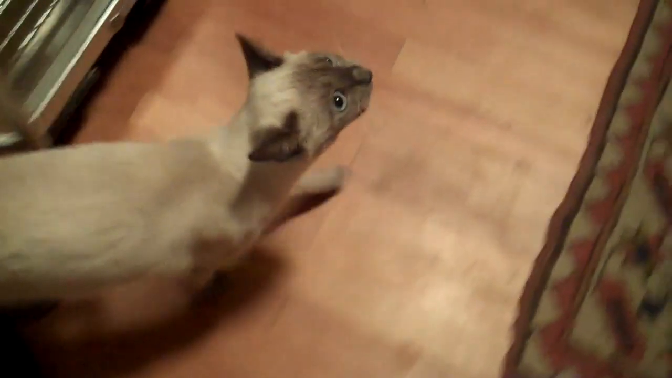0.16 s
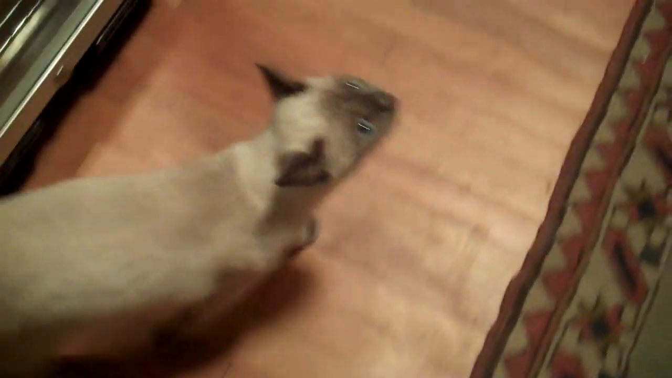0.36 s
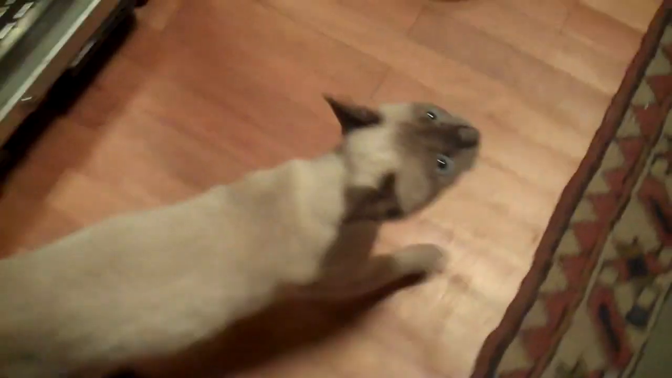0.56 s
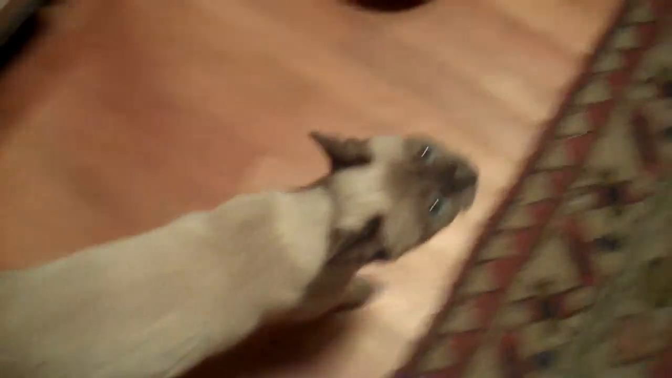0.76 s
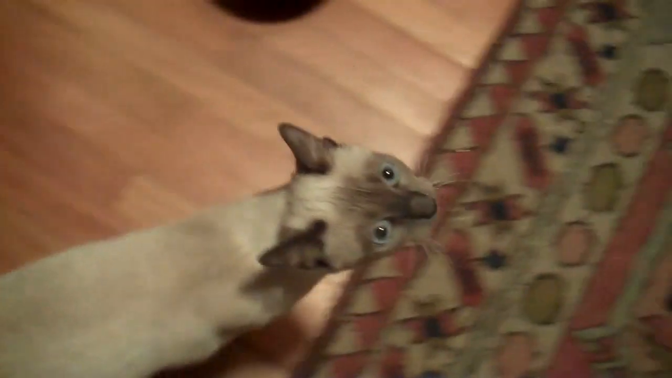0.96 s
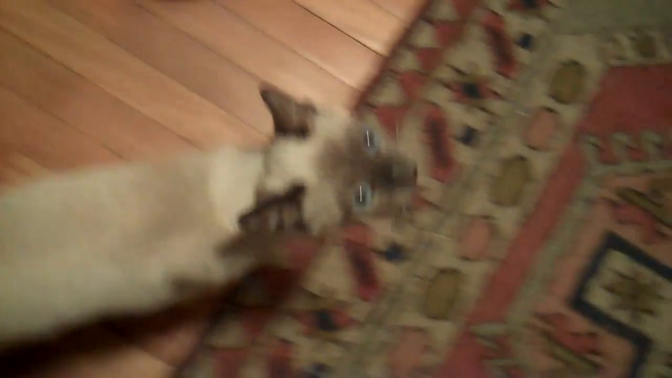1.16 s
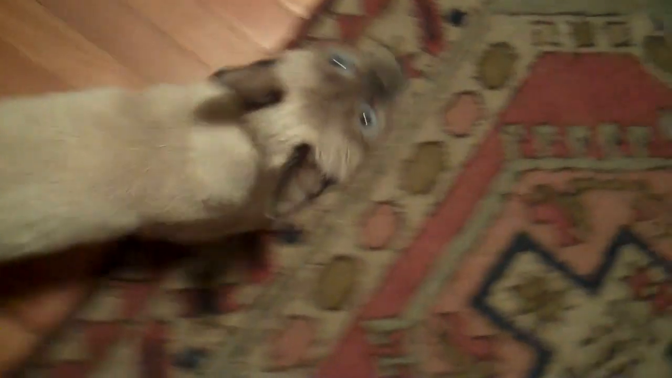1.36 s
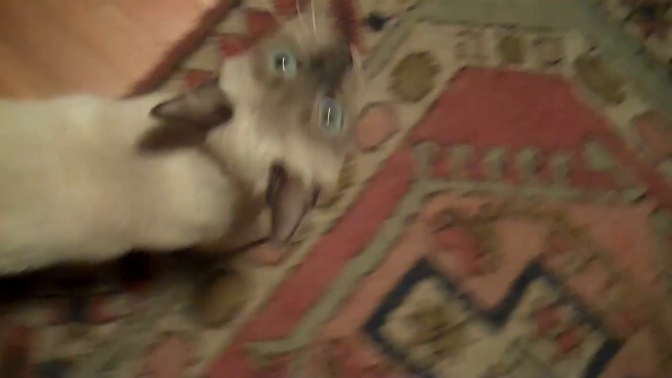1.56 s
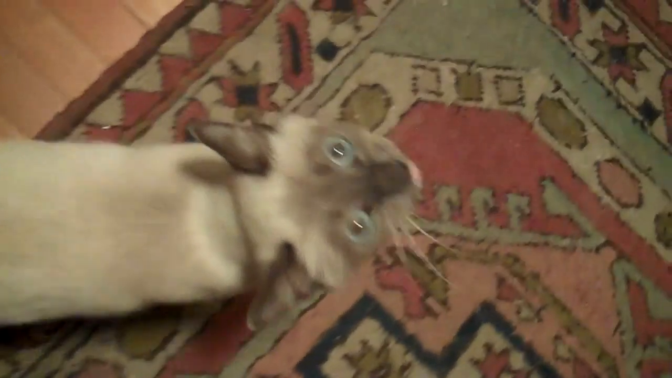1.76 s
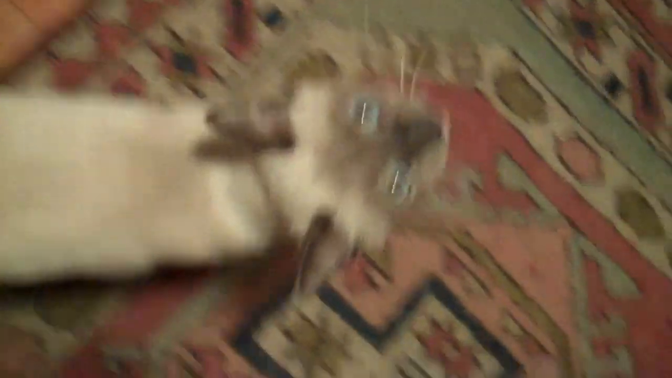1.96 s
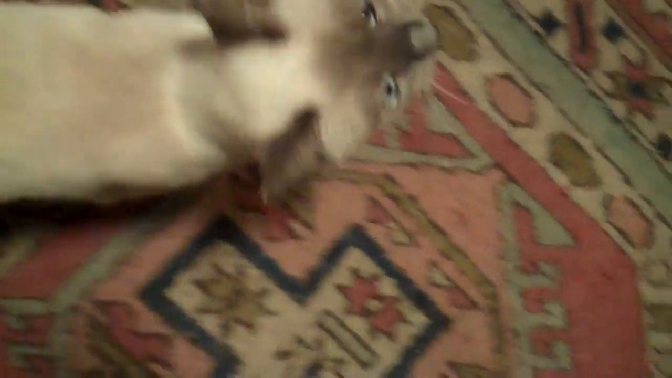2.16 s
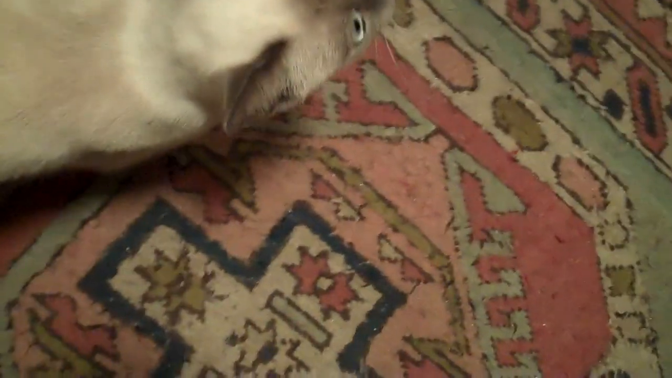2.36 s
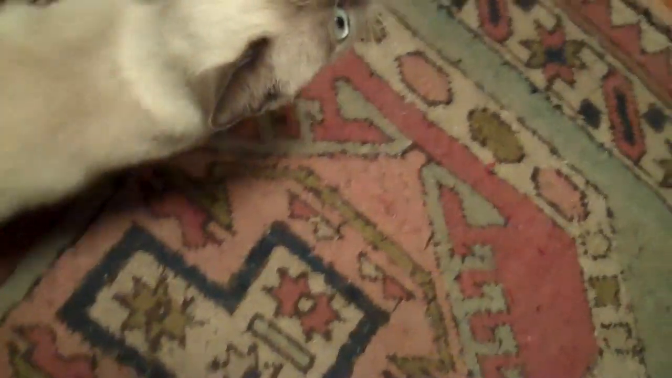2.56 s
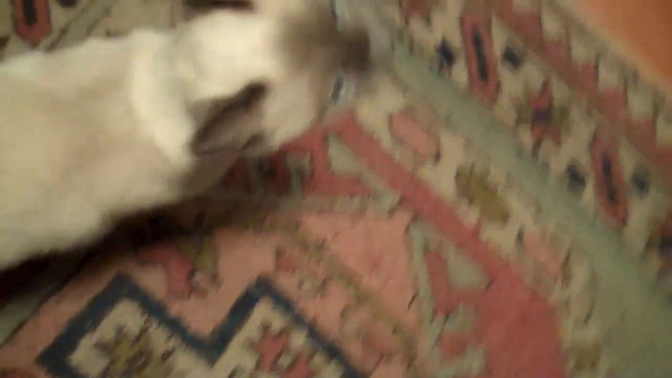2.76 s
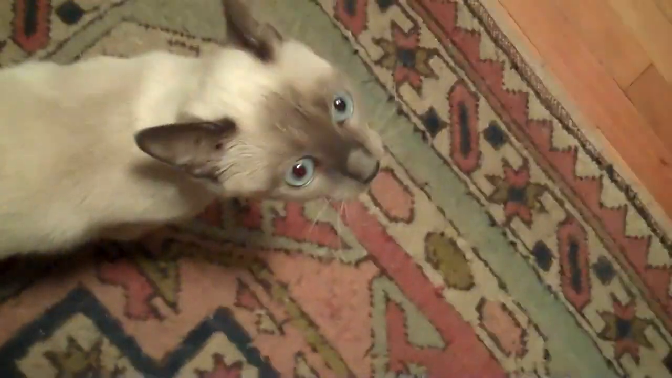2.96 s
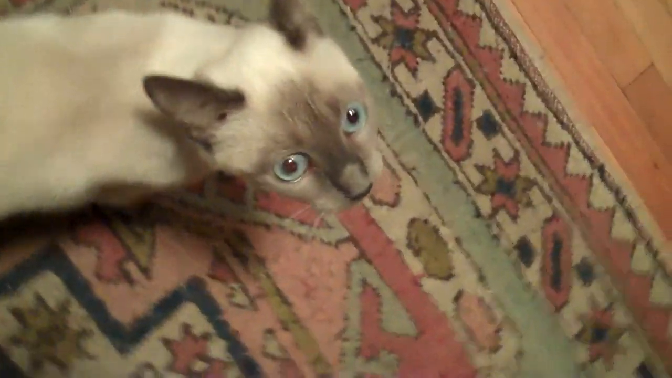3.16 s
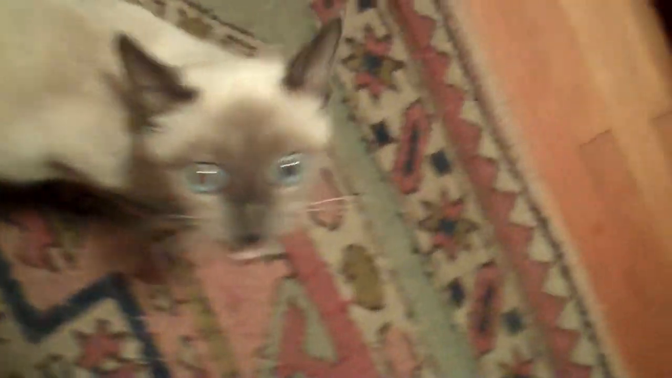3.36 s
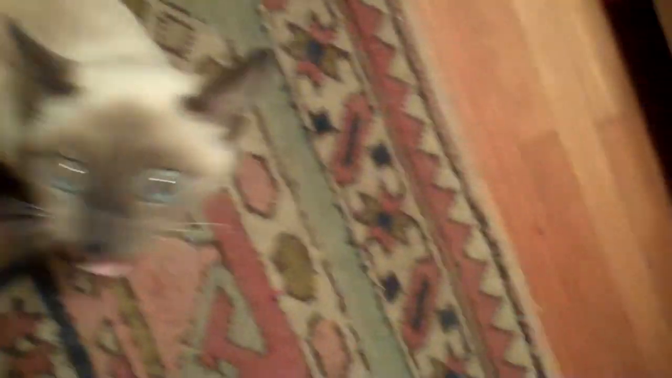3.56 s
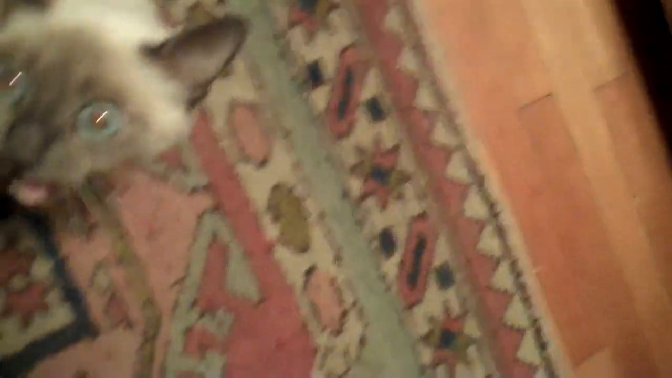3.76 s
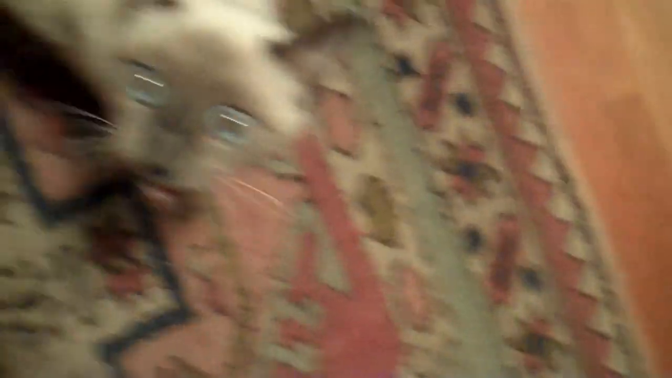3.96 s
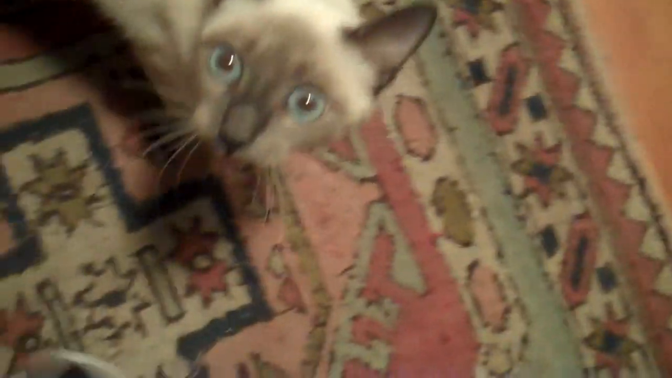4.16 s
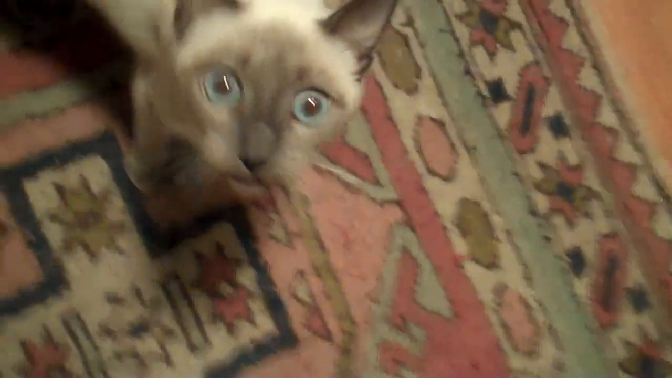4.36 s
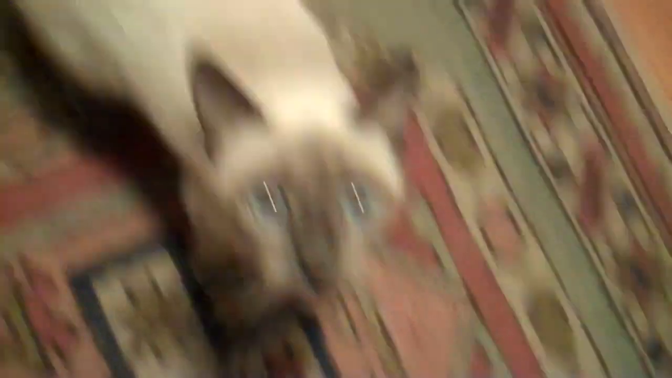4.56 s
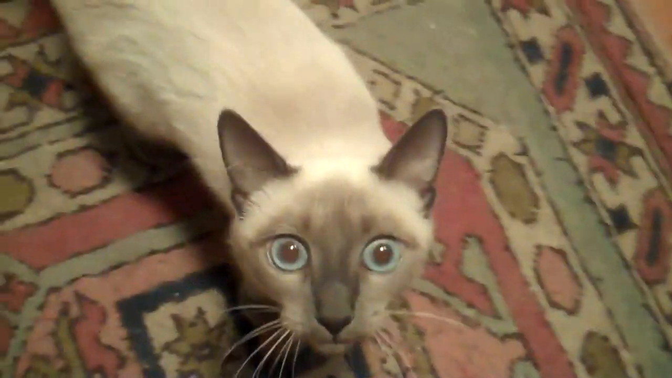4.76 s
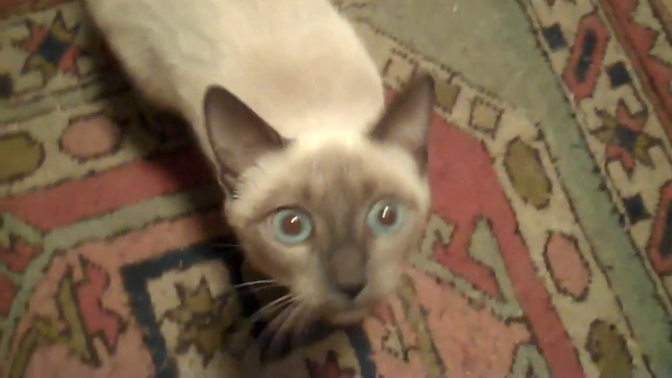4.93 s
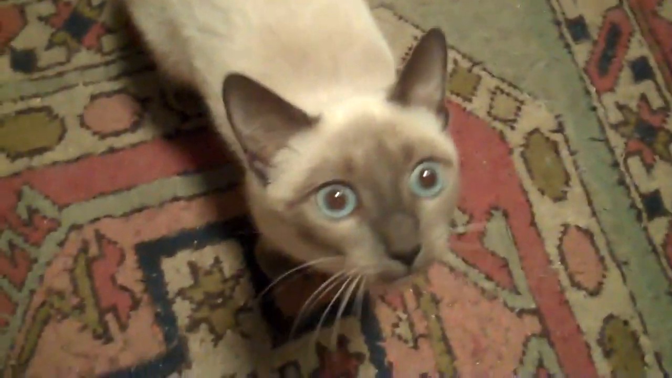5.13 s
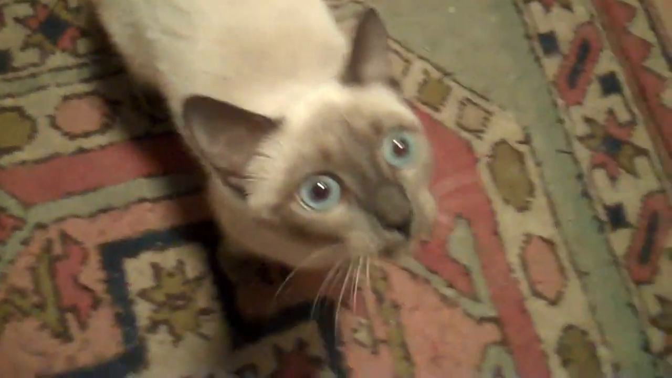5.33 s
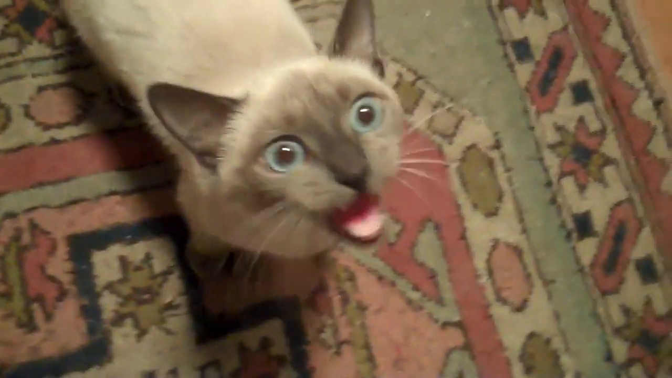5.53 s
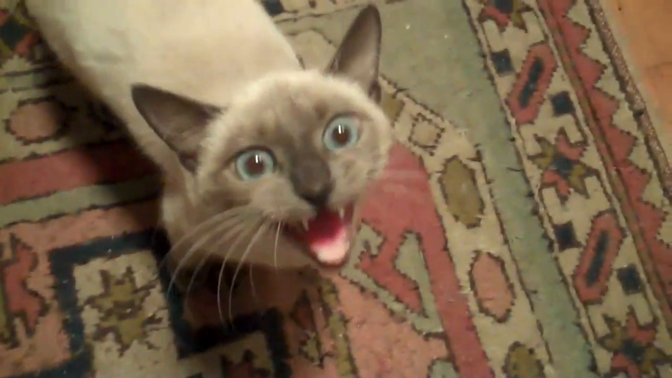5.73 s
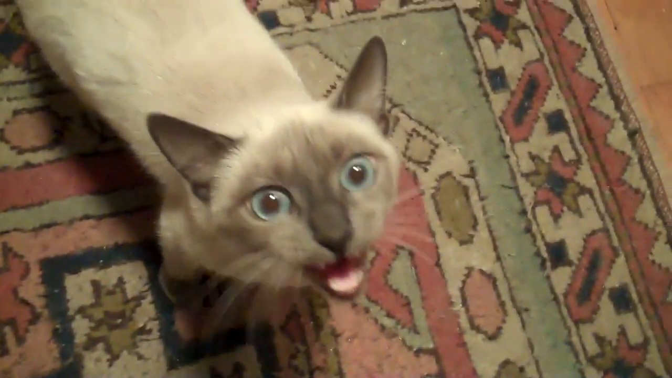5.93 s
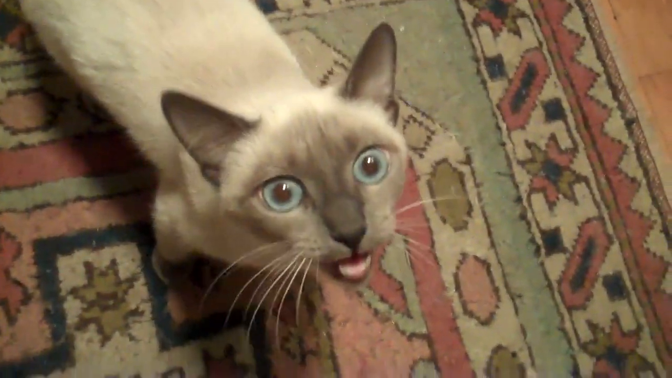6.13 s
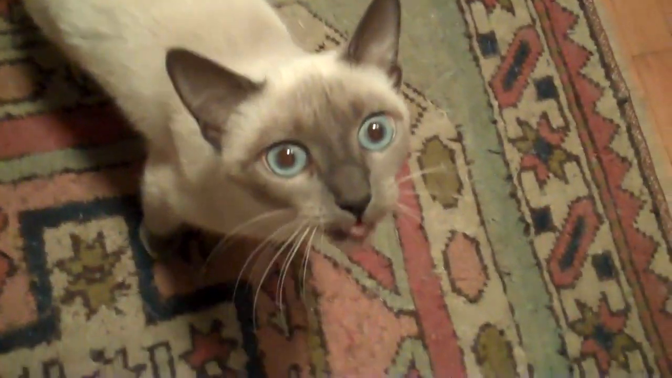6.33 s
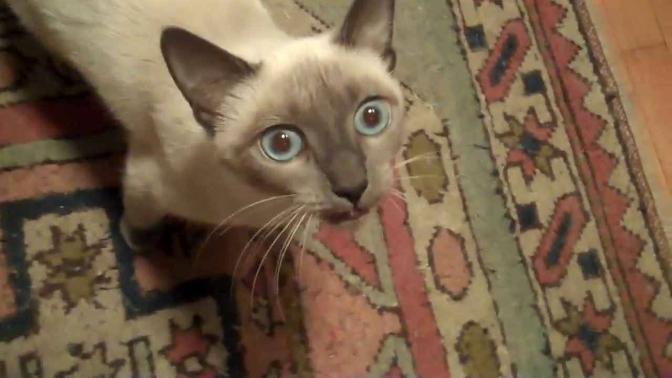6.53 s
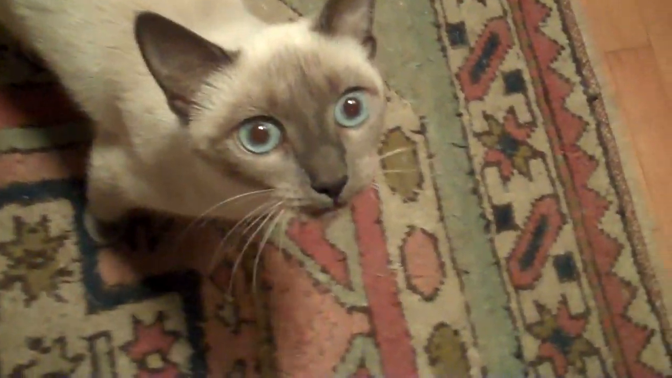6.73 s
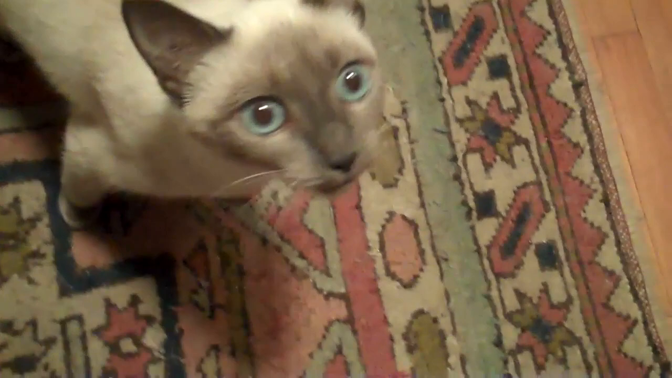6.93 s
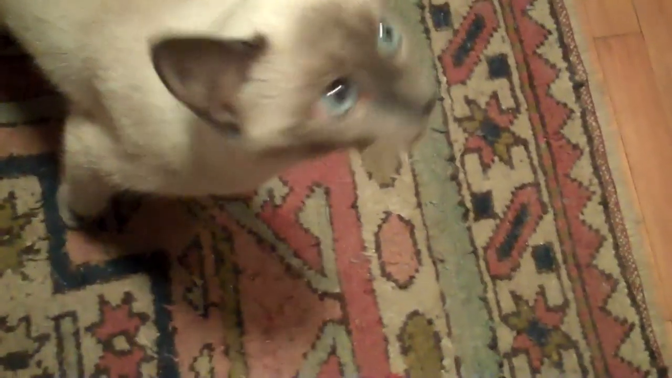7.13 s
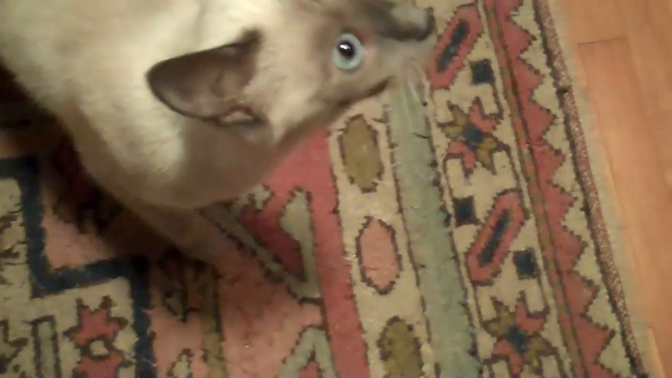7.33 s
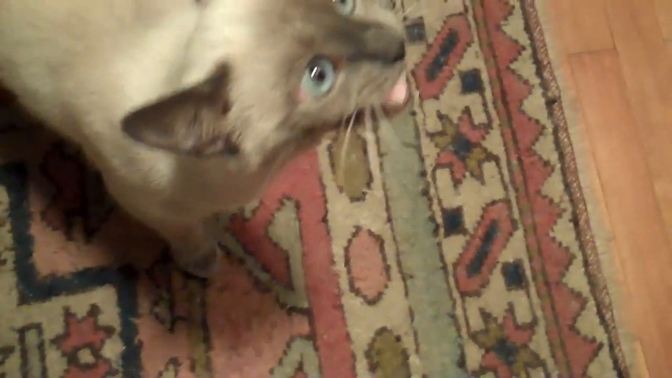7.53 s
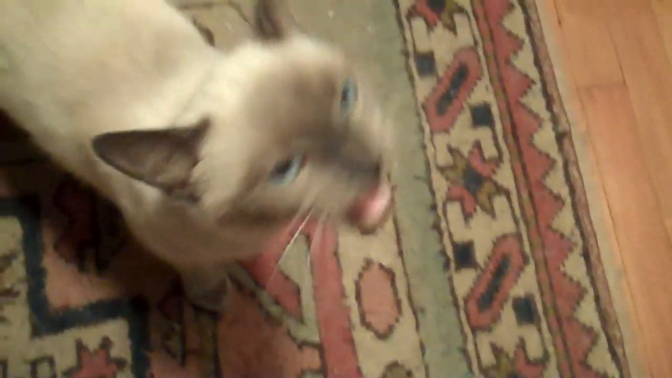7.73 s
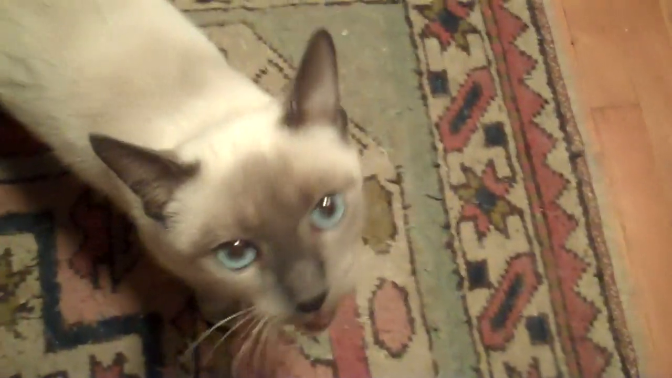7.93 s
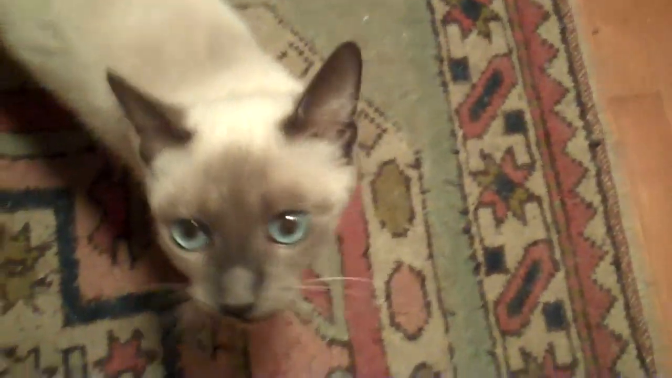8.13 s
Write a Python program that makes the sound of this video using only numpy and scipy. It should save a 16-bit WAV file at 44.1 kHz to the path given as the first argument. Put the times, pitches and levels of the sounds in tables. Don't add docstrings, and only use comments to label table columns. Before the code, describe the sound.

A faint foot scuff, then a high, piercing meow; another follows shortly, then three more spaced over about eight seconds, the last cut off at full voice. Each opens bright and nasal and mostly closes to a hum. Between them are light paw pats, fabric rustles and a tiny click. Close, slightly uneven stereo pickup in a quiet carpeted room with steady high hiss and low hum.

```python
import sys
import numpy as np
from scipy import signal
from scipy.fft import irfft
from scipy.io import wavfile
from scipy.ndimage import uniform_filter1d, minimum_filter1d

SR = 44100
rng = np.random.default_rng(int(sys.argv[2]) if len(sys.argv) > 2 else 0)


def invert_db(level):
    return 10 ** (np.asarray(level, dtype=float) / 20)


def file_out(sig):
    cols = np.atleast_2d(sig).T
    lim = np.clip(cols, -1, 1)
    pcm = np.round(lim * 32767).astype(np.int16)
    wavfile.write(sys.argv[1], SR, pcm)


N = 361179

# frequency [Hz], density [dB per Hz].
LEFT_PORT = [(40, -83), (70, -102.5), (250, -83), (380, -81), (1500, -90), (2500, -88.5), (3000, -84),
             (5300, -81.5), (6000, -75), (7300, -66.5), (8600, -75), (10300, -74.5), (11200, -84),
             (14000, -86.5)]
RIGHT_PORT = [(40, -78.5), (70, -96.5), (250, -83), (380, -81), (1500, -89), (2500, -87), (3000, -82.5),
              (4500, -78), (6000, -69.5), (7300, -80.5), (8600, -83), (10300, -85), (11200, -126.5),
              (14000, -109.2)]
# frequency [Hz], left-right likeness [-1 to 1].
LIKENESS = [(60, -0.78), (150, 0.69), (370, 0.89), (910, 0.73), (2250, 0.33), (5570, -0.3), (13800, 0.34)]
# time [s], level [dB].
HISS = [(0.0, -50), (2.0, -49), (3.06, -49.5), (3.8, -48), (4.75, -51.5), (8.19, -51.5)]
# time [s], level [dB].
HUM = [(0.0, -76), (0.64, -81), (0.9, -68), (3.28, -65), (3.6, -69.5), (8.19, -70)]
# frequency [Hz], T60 [s].
ROOM_T60 = [(500, .45), (1500, .45), (4000, .3), (9000, .2)]
RUMBLE_DB, RUMBLE_SWAY_DB = -59.5, -1.1
DRONE_DB = -5.5

# time [s], rise [s], fall [s], level [dB], high edge [Hz].
STEPS = [
    (.002, 0.0004, 0.12, -46, 2480),
    (0.067, 0.015, 0.088, -45.5, 4040),
    (1.352, 0.0023, 0.069, -43.5, 4050),
    (2.5, 0.0011, 0.019, -48, 1810),
    (3.377, 0.0054, 0.027, -39.5, 5800),
    (4.335, 0.0025, 0.017, -38, 3570),
]
# time [s], rise [s], fall [s], level [dB], low edge [Hz].
RUSTLES = [
    (0.545, .016, 0.023, -34, 3570),
    (0.668, 0.022, 0.018, -31.5, 2240),
    (.695, 0.0086, 0.071, -34.5, 1590),
    (0.733, 0.011, 0.014, -37.5, 1630),
    (4.129, 0.04, 0.063, -43, 2335),
    (4.233, 0.0087, 0.0079, -39, 2430),
    (4.411, 0.016, 0.023, -37.5, 1440),
    (6.483, 0.00027, 0.00063, -28.5, 2500),
    (6.497, 0.012, 0.014, -39, 3900),
]
# time [s], rise [s], fall [s], level [dB], centre [Hz].
SCRAPES = [
    (1.39, 0.016, 0.093, -42, 3020),
    (4.259, 0.0021, 0.0099, -41.5, 920),
    (4.731, 0.0065, 0.014, -46.5, 880),
    (7.485, 0.0015, 0.0042, -36.5, 4300),
]
SCUFF_TOP_HZ, SCUFF_BOTTOM_HZ, SCRAPE_SPAN = 6840, 324, 1.35

# time [s], pitch [Hz].
PITCH = [
    [(0.11, 844), (0.225, 854), (0.253, 898.6), (0.357, 929), (0.429, 889), (0.561, 850), (0.653, 923),
     (0.8, 1006), (1.058, 998)],
    [(1.574, 835), (1.61, 759.5), (1.722, 849), (1.806, 846), (1.838, 798), (1.95, 980), (2.06, 886),
     (2.33, 823), (2.492, 971)],
    [(3.429, 728), (3.485, 702.5), (3.62, 828), (3.701, 817), (3.93, 745.5), (3.997, 800), (4.125, 832),
     (4.2, 803), (4.334, 870)],
    [(5.607, 784), (5.66, 695), (5.745, 761), (5.887, 776.8), (5.959, 753), (6.06, 816.7), (6.291, 841.4),
     (6.387, 878), (6.443, 926)],
    [(7.502, 776), (7.579, 710), (7.679, 766), (7.739, 762), (7.783, 794), (7.887, 807.6), (7.931, 783.6),
     (7.991, 878), (8.187, 935.6)],
]
# time [s], effort [dB], mouth opening [0-1].
EFFORT = [
    [(0.11, -49, 0.74), (0.23, -43.5, 0.97), (0.33, -35, 0.74), (0.43, -39.5, 0.85), (0.54, -44.5, 0.69),
     (0.69, -45, 0.09), (0.83, -50, 0.09), (1.056, -43.5, 0.1)],
    [(1.574, -47.5, 0.83), (1.638, -41.5, .92), (1.79, -39, 0.83), (1.84, -36.5, 0.72),
     (1.872, -41.5, 0.37), (1.96, -42, 0.38), (2.34, -38, 0.39), (2.497, -45, 0.16)],
    [(3.429, -47, 0.77), (3.47, -41, 1), (3.6, -37, 0.95), (3.7, -35.5, 0.69), (3.79, -34, 0.63),
     (3.865, -42, 0.62), (3.913, -42, 0.32), (4.336, -38, 0.22)],
    [(5.607, -43.5, 0.63), (5.635, -40.5, 0.95), (5.84, -34.5, 0.87), (5.917, -33.5, 0.63),
     (5.977, -42.5, 0.53), (6.049, -38.5, 0.18), (6.3, -39.5, 0.09), (6.445, -39, 0.17)],
    [(7.502, -47, 0.57), (7.56, -40.5, 0.82), (7.74, -37.5, 0.99), (7.85, -31.5, 0.6), (7.93, -36, 0.53),
     (8.004, -36, 0.2), (8.13, -37.5, 0.27), (8.187, -36, 0.03)],
]
# chest tone [dB], throat tone [dB], bright partials [dB], overtones of the hum [dB].
FACING = [
    (2, -6.5, -8, -5),
    (0, 0.5, 1, -12),
    (-1.5, -1, -2, 8),
    (-2.5, -1, 3.0, 10),
    (-1, -1, 1, 9),
]
# time [s], length [s], share of pitch [ratio].
HOOKS = [(0.19, 0.016, 0.035), (0.51, 0.011, 0.06), (0.74, 0.017, 0.027), (1.632, .008, 0.0437),
         (1.612, .008, -.025), (2.262, 0.042, 0.0305), (3.462, .012, 0.045), (7.958, 0.011, 0.031),
         (1.665, 0.0118, -0.0197), (0.71, 0.011, -0.031), (6.105, 0.0192, -.008)]
# time [s], rise [s], fall [s], level [dB].
SURGES = [
    (0.312, .008, .03, 13.5),
    (3.53, 0.009, 0.032, 0.5),
    (3.625, 0.0091, 0.08, 11.5),
    (5.825, 0.039, 0.036, 10),
    (7.647, 0.0029, .16, 10),
    (0.24, 0.014, 0.0067, 5.5),
    (1.634, 0.027, .02, 4.5),
    (5.64, 0.035, 0.0083, 4),
    (7.76, 0.017, 0.0072, 3),
    (0.377, .01, 0.013, 5),
]
# time [s], length [s], depth [0-1].
BREAKS = [(0.44, 0.024, 0.2), (0.76, 0.021, 0.65), (1.63, 0.11, 0.19), (3.818, 0.01, 0.28),
          (3.909, 0.0031, 0.9), (4.332, 0.0055, 0.5), (5.913, 0.0092, 0.33), (6.44, 0.0032, 0.2),
          (7.856, 0.0065, 0.2), (7.72, 0.04, 0), (3.463, 0.018, 0.27)]
CHOKES = {1: [(0.205, 0.252, -8.5), (0.361, 0.376, -10), (1.606, 1.627, -17), (5.957, 5.982, -10),
          (0.745, 0.765, -19), (7.515, 7.76, -12.5)], 2: [(0.3, .345, -18), (0.74, .91, -14),
          (1.815, 1.856, 2.5), (1.89, 2.03, -7), (3.805, 3.83, -18), (3.85, 3.875, -11), (5.7, 5.76, -1.5),
          (6.02, 6.08, -12), (7.62, 7.645, -12)]}
CHOKE_EDGE_S = 0.004
# frequency [Hz], gain [dB].
MOUTH = [(2000, 15), (2500, 6), (3100, 2.5), (3900, 1.5), (4700, 3), (5200, -87)]
HUM_COLOUR = 0.47
SNAP_DROP = [0.028, 0.18, 0.13, 0.23, 0.053]
SNAP_S = 0.0163
LIPS_SPREAD_HZ = [6440, 7500, 8000, 7800, 6940]
LIPS_WIDE_HZ, LIPS_S = 5470, 0.48
LIPS_SHUT_S = [.46, 1.86, 3.88, 5.96, 8.0]
LIPS_FADE_S, LIPS_SHUT_DB = 0.06, -16
JAW_SHUT_HZ, JAW_OPEN_HZ, JAW_SHARPNESS, JAW_STEEPNESS = 800, 2590, 4.78, 0.8
CHEST_DB, THROAT_DB = 0.5, 1.5
MOUTH_SHUT_DB, MOUTH_OPEN_DB = -28.5, 18
BRIGHT_SHUT_DB, BRIGHT_OPEN_DB = -3, 9.0
BRIGHT_FROM, BRIGHT_FULL = 0.1, 1


def evened(x):
    return x / np.sqrt(np.mean(x ** 2) + 1e-20)


def read(points, hz):
    f, value = np.transpose(points)
    return np.interp(np.log(hz + 1), np.log(f + 1), value)


def curve(points, t):
    return np.interp(t, *np.transpose(points))


def add(mix, s, sound):
    part = mix[..., max(round(s * SR), 0):][..., :sound.shape[-1]]
    part += sound[..., :part.shape[-1]]


def wander(length, hz):
    size = int(SR / hz)
    return evened(uniform_filter1d(uniform_filter1d(rng.standard_normal(length), size), size))


def bump(t, at_s, width_s):
    return np.exp(-((t - at_s) / width_s) ** 2)


def pair(z, hz):
    same = np.clip(read(LIKENESS, hz), -1, 1)[:, None]
    return np.array([z[0], same * z[0] + np.sqrt(1 - same ** 2) * z[1]])


def floor():
    frames, hz = N // 256 + 5, np.fft.rfftfreq(1024, 1 / SR)
    a, b, c, d, patches, streaks = rng.standard_normal((frames, 513, 6)).T
    patches = evened(uniform_filter1d(uniform_filter1d(patches, 6, 0), 20, 1))
    streaks = evened(uniform_filter1d(uniform_filter1d(streaks, 2, 0), 120, 1))
    t = (np.arange(frames) - 2) * 256 / SR
    low = 1 / (1 + (hz[:, None] / 900) ** 2)
    sway = np.repeat(wander(frames // 8 + 1, SR / 4), 8)[:frames]
    rumble_db = RUMBLE_DB + 52.5 + RUMBLE_SWAY_DB * sway
    hiss_db = curve(HISS, t) + 44.7
    swell_db = low * rumble_db + (1 - low) * hiss_db
    streak_db = 3.54 * streaks * np.clip(hz[:, None] / 4500 - 0.8, 0, 1)
    z = pair([a + 1j * b, c + 1j * d], hz) * invert_db(swell_db + patches + streak_db)
    z *= invert_db(np.array([read(LEFT_PORT, hz), read(RIGHT_PORT, hz)]) + 22.0)[:, :, None]
    return signal.istft(z, nperseg=1024, noverlap=768)[1][:, :N]


def appliance():
    t = np.arange(N) / SR
    hum_db = curve(HUM, t)
    hum = invert_db(hum_db + 2.9 * wander(N, 11)) * np.sin(2 * np.pi * 120 * t + 1.9 * wander(N, 11))
    overtone = invert_db(-66 + 4 * wander(N, 5)) * np.sin(2 * np.pi * 365 * t + 3 * wander(N, 14))
    noise = rng.standard_normal((3, N))
    band = signal.butter(2, [60, 105], btype="band", fs=SR, output="sos")
    drone = signal.sosfilt(band, noise[0] + 0.55 * noise[1:])
    drift = invert_db(-64) * np.sin(2 * np.pi * 27 * t + 0.8 * wander(N, 9)) * [[1], [-1]]
    return hum + overtone + invert_db(hum_db + DRONE_DB) * evened(drone) + drift


def scuff(s, rise, fall, db, low_hz, high_hz):
    t = np.arange(-3 * rise, 6 * fall, 1 / SR)
    z = rng.standard_normal((3, 12000))[:, :len(t)]
    t = t[:z.shape[1]]
    grit = invert_db(2.5 * np.clip(evened(uniform_filter1d(z[2], 90)), -2, 2))
    band = signal.butter(3, [low_hz, high_hz], btype="band", fs=SR, output="sos")
    noise = signal.sosfilt(band, (z[0] + 0.5 * z[:2] * [[0], [1]]) * grit)
    shape = np.where(t < 0, np.exp(-(t / rise) ** 2), np.exp(-t / fall))
    return s + t[0], invert_db(db) * evened(noise) * shape


def scuffs():
    mix = np.zeros((2, N))
    for *row, low_hz in RUSTLES:
        add(mix, *scuff(*row, low_hz, SCUFF_TOP_HZ))
    for *row, high_hz in STEPS:
        add(mix, *scuff(*row, SCUFF_BOTTOM_HZ, high_hz))
    for *row, hz in SCRAPES:
        add(mix, *scuff(*row, hz / SCRAPE_SPAN, hz * SCRAPE_SPAN))
    return ports(mix, lean=0.48, peak=0.48)


def jaw(hz, opening):
    u = hz / (JAW_SHUT_HZ * (JAW_OPEN_HZ / JAW_SHUT_HZ) ** opening)
    return -10 * JAW_STEEPNESS * np.log10((1 - u ** 2) ** 2 + (u / JAW_SHARPNESS) ** 2)


def choke(t, partial):
    return sum(db * np.clip(np.minimum(t - a, b - t) / CHOKE_EDGE_S, 0, 1) for a, b, db in CHOKES[partial])


def upper_partials(t, hz, k, effort_db, opening, facing, spread_hz, shut_s):
    chest, throat, bright_facing_db, hum_facing_db = facing
    mouth_db = effort_db + np.interp(opening, [0, 1], [MOUTH_SHUT_DB + hum_facing_db, MOUTH_OPEN_DB])
    lips_db = LIPS_SHUT_DB * np.clip((t - shut_s) / LIPS_FADE_S, 0, 1)
    open_db = np.interp(opening, [BRIGHT_FROM, BRIGHT_FULL], [BRIGHT_SHUT_DB, BRIGHT_OPEN_DB])
    bright_db = effort_db + bright_facing_db + lips_db + open_db
    climb = np.minimum((t - t[0]) / LIPS_S, 1) ** 1.14
    bright_hz = LIPS_WIDE_HZ + (spread_hz - LIPS_WIDE_HZ) * climb
    mouth = invert_db(read(MOUTH, k * hz) * np.interp(opening, [0.2, 0.7], [HUM_COLOUR, 1]))
    bright = 1 / (1 + ((k * hz - bright_hz) / 1100) ** 2) ** 1.58
    level = np.sqrt(2) * invert_db(mouth_db) * mouth / np.linalg.norm(mouth, axis=0)
    level = level + np.sqrt(2) * invert_db(bright_db) * bright / np.linalg.norm(bright, axis=0)
    level = level * (1 - 0.9 / (1 + ((k * hz - 4450) / 600) ** 2))
    surge_db = sum(db * bump(t, at, np.where(t < at, rise, fall)) for at, rise, fall, db in SURGES)
    flicker_db = np.minimum(k - 2.2, 3.4) * np.array([wander(len(t), 70) for _ in k])
    return level * invert_db(surge_db * (k == 3) + flicker_db)


def meow(pitch, effort, facing, spread_hz, shut_s, drop):
    end_s = pitch[-1][0] + SNAP_S
    t = np.arange(pitch[0][0], end_s, 1 / SR)
    at, *columns = np.transpose(effort)
    effort_db, opening = (np.interp(t, at, c) for c in columns)
    snap = drop * np.clip(2 * (t - pitch[-1][0]) / SNAP_S, 0, 1)
    hook = sum(share * bump(t, at, length) for at, length, share in HOOKS)
    creak = sum(depth * bump(t, at, length) for at, length, depth in BREAKS)
    hz = uniform_filter1d(curve(pitch, t) * (1 - snap + hook), 220)
    jitter = 0.003 * wander(len(t), 40) + (0.0035 + 0.025 * creak) * wander(len(t), 400)
    turns = np.cumsum(hz * (1 + jitter)) / SR

    k = np.arange(3, 14)[:, None]
    upper = upper_partials(t, hz, k, effort_db, opening, facing, spread_hz, shut_s)
    voice = (upper * np.cos(2 * np.pi * k * turns - 0.233 * k ** 2)).sum(0)
    chest_db = effort_db + CHEST_DB + facing[0] + choke(t, 1) + jaw(hz, opening)
    throat_db = effort_db + THROAT_DB + facing[1] + choke(t, 2) + jaw(2 * hz, opening)
    voice += np.sqrt(2) * invert_db(chest_db + 1.1 * wander(len(t), 15)) * np.cos(2 * np.pi * turns)
    voice += np.sqrt(2) * invert_db(throat_db + 3.1 * wander(len(t), 38)) * np.cos(4 * np.pi * turns - 1.2)
    envelope = np.minimum((t - t[0]) * 400, 1) * np.minimum((end_s - t) * 170, 1) ** 2
    return t[0], voice * (1 + (0.023 + creak) * wander(len(t), 314)) * envelope


def meows():
    cat = np.zeros(N)
    for call in zip(PITCH, EFFORT, FACING, LIPS_SPREAD_HZ, LIPS_SHUT_S, SNAP_DROP):
        add(cat, *meow(*call))
    return cat


def room(x):
    taps = np.zeros((2, SR // 2))
    slots = np.arange(260, SR // 2 - 20, 20)
    at = slots + rng.integers(0, 20, (2, len(slots)))
    np.put_along_axis(taps, at, rng.choice([-1., 1.], at.shape), 1)
    hz, t, z = signal.stft(taps, SR, nperseg=256)
    decay = invert_db(-60 * t / read(ROOM_T60, hz)[:, None])
    tail = signal.istft(pair(z, hz) * decay, SR, nperseg=256)[1]
    return signal.oaconvolve(x[None], tail / np.linalg.norm(tail[0]), axes=1)[:, :N]


def ports(x, lean, peak):
    hz = np.fft.rfftfreq(1024, 1 / SR)
    left, right = read(LEFT_PORT, hz), read(RIGHT_PORT, hz)
    lift_db = np.maximum((left + right) / 2 - read(LEFT_PORT, 3000), 0) * (hz > 3000)
    gain = invert_db(peak * lift_db + lean * np.array([left - right, right - left]) / 2)
    taps = np.roll(irfft(gain), 512, axis=1) * np.hanning(1024)
    return signal.oaconvolve(x, taps, "same", axes=1)


def mask(x, below_db, cut_db):
    hz, _, z = signal.stft(x, SR, nperseg=1024)
    level_db = 10 * np.log10(uniform_filter1d(abs(z) ** 2, 5, axis=1) + 1e-14)
    near_db = -minimum_filter1d(-level_db, size=17, axis=1, origin=6)
    hidden = level_db < near_db - read(below_db, hz)[:, None]
    return signal.istft(z * invert_db(-cut_db * hidden), SR, nperseg=1024)[1][:, :N]


def scene():
    steps = scuffs()
    cat = meows()
    echo = room(invert_db(-12) * cat + invert_db(-7) * steps.mean(0))
    return ports(cat + echo, lean=1.0, peak=0) + steps + floor() + appliance()


def low_pass(x):
    return signal.sosfilt(signal.butter(12, 14390, fs=SR, output="sos"), x)


def record(dry):
    edge = signal.firwin(511, 14170, window=("kaiser", 9), fs=SR)
    limited = signal.oaconvolve(dry, edge[None], "same")
    below_db = [(900, 45), (1300, 36), (2000, 27), (4300, 23), (5000, 50)]  # (Hz, dB)
    clean = mask(limited, below_db, cut_db=22)
    return low_pass(clean)


dry = scene()
out = record(dry)
file_out(out)
```